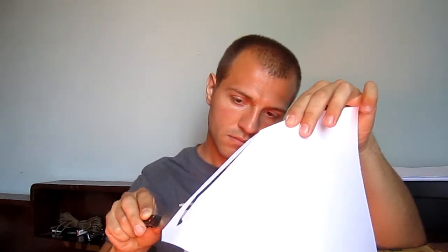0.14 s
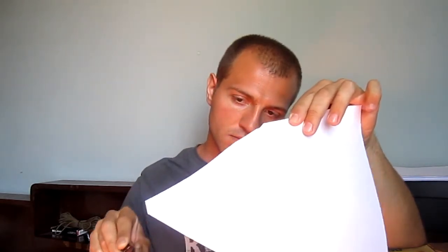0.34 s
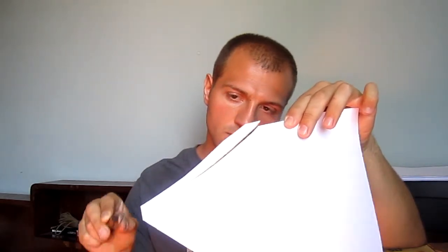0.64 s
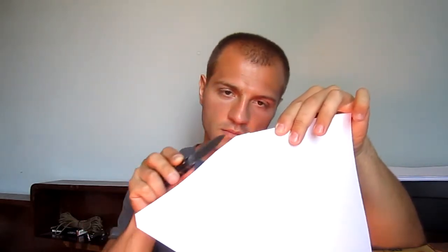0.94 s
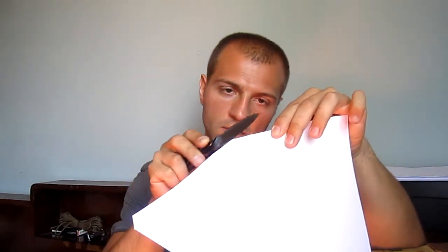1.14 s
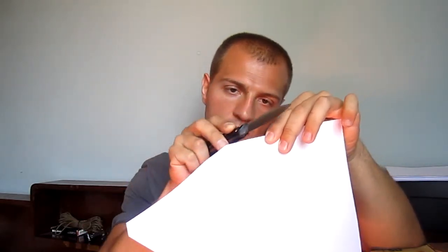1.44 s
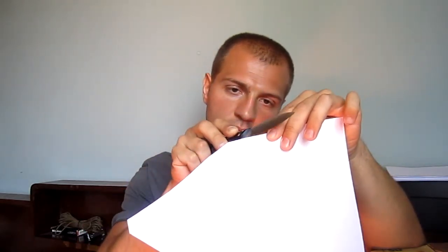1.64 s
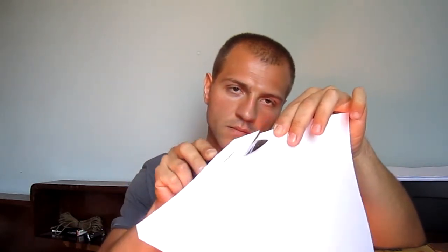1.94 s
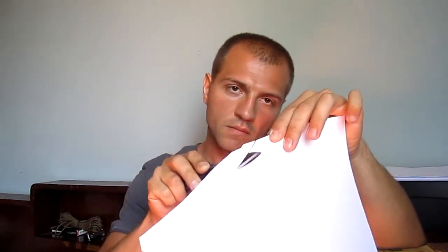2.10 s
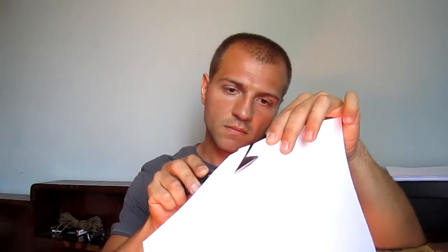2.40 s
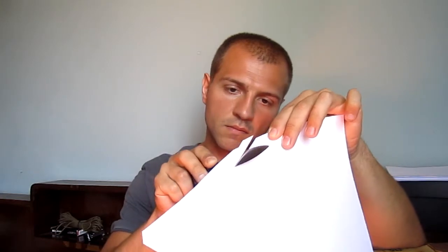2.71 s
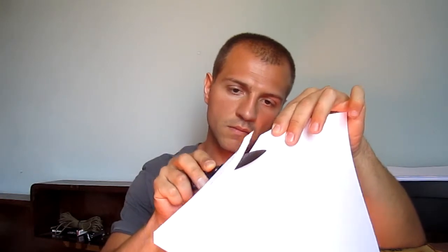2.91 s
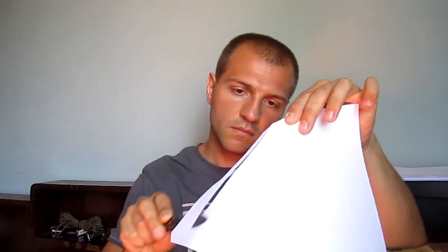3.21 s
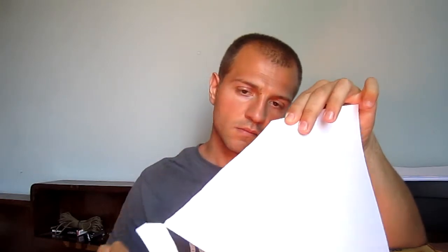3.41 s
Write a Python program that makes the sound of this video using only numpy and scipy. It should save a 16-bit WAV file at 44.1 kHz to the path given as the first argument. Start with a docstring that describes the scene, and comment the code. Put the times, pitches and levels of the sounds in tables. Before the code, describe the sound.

Close, dry paper cutting by knife indoors: one short raspy slice already under way, a quiet gap, a weaker slice that catches, light rubbing in the notch, then a strong bright rip ending in crisp ticks and faint room hum.

```python
"""Knife slicing a sheet of paper

A knife slices a hand-held sheet in three strokes, close by in a small room. Snapping fibres, a dense
stream of random impulses, and rubbing noise ring the sheet's resonances. The second stroke snags, the
blade scrapes in the notch, then rips through. Decaying noise bursts make the ticks, flicks and flaps,
over filtered room air, hum and a low rumble."""
import sys
import numpy as np
from scipy import signal
from scipy.fft import rfft, irfft, next_fast_len
from scipy.io import wavfile
from scipy.ndimage import uniform_filter1d

SR = 44100
rng = np.random.default_rng(int(sys.argv[2]) if len(sys.argv) > 2 else 0)


def unload_wav(signal):
    """Save mono or channel-first audio to the path in sys.argv[1] as 16-bit WAV at rate SR, clipped to [-1, 1]."""
    wavfile.write(
        sys.argv[1],
        SR,
        np.round(np.clip(np.atleast_2d(signal).T, -1, 1) * 32767).astype(np.int16),
    )


N = 156555

# fibres: snap rate and spread, wander of the blade's catch, rub relative to the snaps
SNAPS_PER_S, SNAP_SPREAD_DB, CATCH_PER_S, CATCH_DB, RUB_DB = 2600, 2.5, 260, 1.12, -3.5
# the bending sheet favours now one band, now another
FLEX_DB, FLEX_PER_S = 1.6, 35
# strokes: bite and release time constants, width of the zing, trims on the cuts and the scrape
ATTACK_S, RELEASE_S, ZING_WIDTH_HZ, CUT_DB, SCRAPE_DB = 0.0016, 0.0064, 600, -1, -1
RUMBLE_HZ, RUMBLE_WIDTH_HZ, AIR_DB = 77.4, 24.5, -43.5
# reflections relative to the direct sound, for the paper and for the sharp snaps
ROOM_DB, TICK_ROOM_DB = -5.5, -7
ROOM_LOW_T60_S, ROOM_HIGH_T60_S, ROOM_SPLIT_HZ, ROOM_DELAY_S = 0.26, 0.19, 2360, 0.004
TOP_HZ = 15680


def undb(db):
    """Decibels to gain."""
    return 10 ** (np.asarray(db) / 20)


def unit(x):
    """Scale to an rms of one."""
    return x / np.sqrt(np.mean(x ** 2))


def colour(x, points):
    """Minimum-phase filter through (Hz, dB) points, so nothing sounds ahead of its cause."""
    hz, db = np.array(points).T
    size = 4096
    f = np.maximum(np.fft.rfftfreq(size, 1 / SR), 1)
    log_gain = np.log(undb(np.interp(np.log(f), np.log(hz), db)))
    # folding the cepstrum forward makes the filter causal
    cepstrum = irfft(log_gain)
    cepstrum[1:size // 2] *= 2
    cepstrum[size // 2 + 1:] = 0
    impulse = irfft(np.exp(rfft(cepstrum)))
    return signal.fftconvolve(x, impulse)[:N]


def ring(x, hz, width):
    """One resonance, gain one at its centre."""
    return signal.lfilter(*signal.iirpeak(hz, hz / width, fs=SR), x)


def walk(rate):
    """Random wander with an rms of one, drawing a new value `rate` times a second."""
    hold = max(int(SR / rate), 1)
    steps = np.repeat(rng.standard_normal(N // hold + 1), hold)
    return unit(uniform_filter1d(steps, hold)[:N])


def force(t, curve):
    """Gain along a stroke of (s, dB) points, with a quick bite and release."""
    s, db = np.array(curve).T
    bite = np.maximum(s[0] - t, 0) / ATTACK_S
    release = np.maximum(t - s[-1], 0) / RELEASE_S
    return undb(np.interp(t, s, db)) * np.exp(-bite - release)


def fibres():
    """Fibres snap in uneven bunches while the flat of the blade rubs; both ring the sheet."""
    # Resonances of the held sheet. Each row: centre in Hz, width in Hz, gain in dB.
    sheet_modes = [(626, 20, 3), (776, 42, -0.5), (815, 28, -5.5), (1150, 36, -8.5), (1250, 27, -6.5),
                   (1303, 36, -3), (1612, 49, -6), (1817, 36, -1.5), (2055, 40, -1), (2985, 60, -4),
                   (3200, 34, -1), (3700, 30, -8), (4220, 30, -1), (6340, 33, -9)]
    strength = undb(SNAP_SPREAD_DB * rng.standard_normal(N))
    snaps = (rng.random(N) < SNAPS_PER_S / SR) * rng.choice([-1, 1], N) * strength
    rub = undb(RUB_DB) * rng.standard_normal(N)
    push = (unit(snaps) + rub) * undb(CATCH_DB * walk(CATCH_PER_S))
    return push + sum(undb(db) * ring(push, hz, width) for hz, width, db in sheet_modes)


def flex(x):
    """Each band swells and sinks on its own as the sheet bends."""
    edges_hz = [0, 1000, 1600, 2400, 3500, 5000, 7000, 10000, SR]
    size = next_fast_len(N)
    f, spectrum = np.fft.rfftfreq(size, 1 / SR), rfft(x, size)
    flexed = np.zeros(N)
    for lo, hi in zip(edges_hz, edges_hz[1:]):
        band = irfft(spectrum * (f >= lo) * (f < hi), size)[:N]
        flexed += band * undb(FLEX_DB * walk(FLEX_PER_S))
    return flexed


def zing(t, tear, path):
    """A narrow paper resonance with a moving centre, driven by the fibres."""
    s, hz, db = np.array(path).T
    carrier = np.exp(2j * np.pi * np.cumsum(np.interp(t, s, hz)) / SR)
    # shift the centre to zero, low-pass, then shift back
    low_pass = signal.butter(2, ZING_WIDTH_HZ / 2, fs=SR, output="sos")
    band = signal.sosfilt(low_pass, tear / carrier)
    return undb(np.interp(t, s, db)) * unit((band * carrier).real)


def cut(t, tear, curve, early, late, turn, path):
    """One stroke: the colour shifts as the blade travels down the sheet."""
    travel = np.interp(t, turn, [0, 1])
    rasp = (1 - travel) * unit(colour(tear, early)) + travel * unit(colour(tear, late))
    return undb(CUT_DB) * force(t, curve) * (rasp + zing(t, fibres(), path))


def first_cut(t, tear):
    """The blade bites at once and its pressure shapes the level of the first stroke."""
    # Force of the blade. Each row: time in seconds, level in dB ahead of the cut trim.
    pressure = [(0.0, -21.5), (0.05, -23.5), (0.078, -27), (0.134, -21), (0.152, -25), (0.224, -23),
                (0.27, -39)]
    # Colour of the sheet early and late in the stroke. Each row: frequency in Hz, relative level in dB.
    early = [(410, -42), (700, -15), (776, -10.5), (861, -13), (1290, -1.5), (1850, -4), (1950, -10),
             (2110, -5), (2370, -12), (3070, -10.5), (4640, -14.5), (6500, -8), (7400, -19), (8430, -14.5),
             (9600, -29), (13800, -31), (15500, -49)]
    late = [(410, -45), (700, -21), (797, -13), (993, -12), (1190, 2), (1450, -12), (1780, -2.5),
            (2340, -11.5), (2630, -5.5), (4030, -9.5), (5290, -5.5), (6420, -8), (7400, -18.5), (8540, -16),
            (15500, -39)]
    # Zing moving with the blade. Each row: time in seconds, centre in Hz, level against the rasp in dB.
    path = [(0, 2770, -9), (.06, 2650, -5), (.14, 2670, -8.5), (.24, 2880, -14)]
    turn_s = (0.15, 0.18)  # early to late colour
    return cut(t, tear, pressure, early, late, turn_s, path)


def snagged_cut(t, tear):
    """The second stroke presses through the fibres until it snags."""
    # Force of the blade. Each row: time in seconds, level in dB ahead of the cut trim.
    pressure = [(1.739, -29.5), (1.77, -33), (1.8, -30), (1.85, -28), (1.93, -23.5), (1.99, -25),
                (2.066, -22), (2.088, -28.5), (2.094, -44)]
    # Colour of the sheet early and late in the stroke. Each row: frequency in Hz, relative level in dB.
    early = [(410, -43), (700, -16), (787, -0.5), (980, -6), (1320, 1), (1450, -2), (1850, -0.5),
             (2030, -11.5), (2430, 0.5), (2630, -8), (4580, -2), (6180, -6), (7600, -13.5), (9110, -12.5),
             (13600, -30), (15500, -41)]
    late = [(410, -42), (700, -8.5), (776, -5.5), (1090, -7.5), (1320, -0.5), (1430, -7), (1870, -4.5),
            (2250, -11), (2430, -5), (3270, -8), (4030, -7), (5080, -3), (6850, -18), (8540, -13),
            (12800, -22.5), (15500, -34)]
    # Zing moving with the blade. Each row: time in seconds, centre in Hz, level against the rasp in dB.
    path = [(1.75, 3300, -9.5), (1.85, 3300, -19), (1.93, 3350, -8), (2.08, 3200, -22)]
    turn_s = (1.83, 2.06)  # early to late colour
    return cut(t, tear, pressure, early, late, turn_s, path)


def last_cut(t, tear):
    """The freed blade rips through, with the most force near the end."""
    # Force of the blade. Each row: time in seconds, level in dB ahead of the cut trim.
    pressure = [(2.945, -39.5), (2.962, -26), (3.0, -23.5), (3.05, -21), (3.085, -20), (3.122, -17.5),
                (3.155, -19.5), (3.24, -16.5), (3.3, -15), (3.349, -18), (3.378, -38.5)]
    # Colour of the sheet early and late in the stroke. Each row: frequency in Hz, relative level in dB.
    early = [(410, -43), (700, -14), (797, -5), (1070, -6), (1270, -4), (1410, -7), (1780, -5), (1920, -9),
             (2050, -8.5), (2730, -7), (3270, -3.5), (3540, -4), (5640, -3.5), (7400, -9.5), (9230, -10.5),
             (11200, -25), (15500, -28)]
    late = [(410, -42), (700, -8.5), (737, -3.5), (980, -6.5), (1160, 0), (1430, -6.5), (1830, -2.5),
            (1920, -9), (2190, -8), (3360, -6.5), (3920, -9), (4240, -7), (4700, -5.5), (6260, -8),
            (7600, -12.5), (12400, -24), (15500, -41)]
    # Zing moving with the blade. Each row: time in seconds, centre in Hz, level against the rasp in dB.
    path = [(2.96, 5700, -7), (3.02, 5700, -3), (3.09, 6100, -8.5), (3.18, 5300, -18), (3.26, 6000, -10),
            (3.3, 6500, -3.5), (3.33, 5860, -7), (3.37, 5900, -27)]
    turn_s = (3.18, 3.2)  # early to late colour
    return cut(t, tear, pressure, early, late, turn_s, path)


def body(t):
    """The whole sheet drums low under the blade while it is being cut."""
    # Drumming in each cut. Each row: time in seconds, level in dB.
    first = [(0, -41), (.14, -42.5), (.26, -46)]
    snagged = [(1.74, -42), (1.85, -43.5), (1.96, -35), (2.08, -38)]
    last = [(2.96, -40.5), (3.05, -36.5), (3.13, -35), (3.17, -37.5), (3.25, -37), (3.345, -30.5),
            (3.37, -43)]
    # Colour of the drumming. Each row: frequency in Hz, relative level in dB.
    drum_tone = [(70, -27.5), (100, -15), (130, 1), (190, -2.5), (250, -4), (320, 1.5), (400, -2), (490, 2),
                 (560, -1), (630, 1.5), (800, -7.5), (2000, -33.5)]
    level = force(t, first) + force(t, snagged) + force(t, last)
    return level * unit(colour(fibres(), drum_tone))


def sizzle(t):
    """The finest fibres spit at the top of the treble."""
    # Sizzle of the edge in two cuts. Each row: time in seconds, level in dB.
    snagged = [(1.87, -54), (1.9, -47), (2.0, -52), (2.085, -53)]
    last = [(3.33, -54), (3.35, -40), (3.375, -45), (3.4, -57), (3.43, -52)]
    # Colour of the sizzle. Each row: frequency in Hz, relative level in dB.
    sizzle_tone = [(3000, -30), (7500, -10), (9500, -4), (11000, -1), (13000, 2), (14000, -6), (15500, -10)]
    return (force(t, snagged) + force(t, last)) * unit(colour(fibres(), sizzle_tone))


def scrape(t):
    """The stuck blade saws lightly in its notch."""
    # Force of the rubbing blade. Each row: time in seconds, level in dB ahead of the scrape trim.
    rubbing = [(2.555, -45), (2.66, -45.5), (2.765, -48), (2.785, -67), (2.87, -56), (2.941, -44.5)]
    # Colour of the scrape. Each row: frequency in Hz, relative level in dB.
    scrape_tone = [(300, -2), (1500, 1), (2500, -9.5), (3300, -2.5), (4000, -6), (5200, -1), (6400, -7),
                   (7500, -14.5), (9200, -10), (10500, -20), (15500, -27)]
    return undb(SCRAPE_DB) * force(t, rubbing) * unit(colour(fibres(), scrape_tone))


def crinkles(t, events, tone):
    """Sudden bursts of coloured noise that die away exponentially."""
    envelope = np.zeros(N)
    for s, db, decay in events:
        envelope += undb(db) * (t >= s) * np.exp(-np.maximum(t - s, 0) / decay)
    noise = rng.standard_normal(N)
    return colour(envelope * noise, tone) / np.std(colour(noise, tone))


def ticks(t):
    """The edge catches on the paper in crisp, very short bursts."""
    # Catches of the edge. Each row: start in seconds, level in dB, decay time constant in seconds.
    catches = [(0.8331, -38.5, 0.0033), (1.738, -35, 0.0045), (2.129, -30.5, 0.0066), (2.135, -32.5, .005),
               (2.1836, -35, .002), (2.197, -32, 0.0048), (2.208, -36.5, 0.0021), (2.527, -40, .002),
               (2.561, -38, 0.0017), (2.9624, -21, 0.0015), (3.297, -8, 0.0011), (3.35, -17, 0.002),
               (3.413, -41, .003), (3.421, -30, .006), (3.432, -27, 0.0018)]
    # Colour of the ticks. Each row: frequency in Hz, relative level in dB.
    tick_tone = [(200, -21), (1300, 6.5), (2300, -3), (3300, -1.5), (5500, -3), (7200, -16), (9000, -12),
                 (13000, -28), (15500, -45)]
    return crinkles(t, catches, tick_tone)


def flicks(t):
    """The loose strip and the sheet's edge buckle suddenly."""
    # Flicks of the paper. Each row: start in seconds, level in dB, decay time constant in seconds.
    buckles = [(0.2817, -19, 0.0057), (0.288, -22.5, 0.0046), (.356, -42, .005), (.371, -37, .006),
               (.424, -43, .008), (1.738, -34, .002), (2.956, -33, .004), (2.962, -27, 0.003),
               (3.418, -32, 0.011), (3.463, -37, 0.0047)]
    # Colour of the flicks. Each row: frequency in Hz, relative level in dB.
    flick_tone = [(59, -48), (100, -20), (867, 4.5), (1090, 2.5), (2470, -4.5), (2630, -9), (3110, -7),
                  (3390, -9), (4840, -11.5), (9260, -25.5), (15000, -51)]
    return crinkles(t, buckles, flick_tone)


def flaps(t):
    """The sheet swings back and flaps softly, a duller and slower burst."""
    # Flaps of the sheet. Each row: start in seconds, level in dB, decay time constant in seconds.
    swings = [(0.281, -36, 0.041), (0.347, -35.5, 0.033), (0.416, -45, 0.032), (3.416, -37, .03)]
    # Colour of the flaps. Each row: frequency in Hz, relative level in dB.
    flap_tone = [(80, -16), (180, -7.5), (320, 5), (600, -5), (1400, -9.5), (3000, -22), (8000, -52)]
    return crinkles(t, swings, flap_tone)


def bumps(t):
    """The blade bumps dully against the taut sheet."""
    # Bumps of the blade. Each row: start in seconds, level in dB, decay time constant in seconds.
    knocks = [(1.79, -47, .06), (1.94, -38.5, .05), (3.2, -43, .06)]
    # Colour of the bumps. Each row: frequency in Hz, relative level in dB.
    bump_tone = [(60, -30), (115, -3), (195, -1), (270, -16), (600, -32), (2000, -60)]
    return crinkles(t, knocks, bump_tone)


def room(t, x, wet_db):
    """Reflections of a small room as decaying noise; the treble dies first."""
    age = t[:SR // 2]
    noise = rng.standard_normal(len(age))
    low = signal.sosfilt(signal.butter(2, ROOM_SPLIT_HZ, fs=SR, output="sos"), noise)
    high = signal.sosfilt(signal.butter(2, ROOM_SPLIT_HZ, "high", fs=SR, output="sos"), noise)
    low_tail = low * np.exp(-np.log(1000) * age / ROOM_LOW_T60_S)
    high_tail = high * np.exp(-np.log(1000) * age / ROOM_HIGH_T60_S)
    # subtracting avoids a notch where the two bands meet
    tail = (low_tail - high_tail) * (age > ROOM_DELAY_S)
    wet = undb(wet_db)
    reflections = signal.fftconvolve(x, tail / np.linalg.norm(tail))[:N]
    return (x + wet * reflections) / np.hypot(1, wet)


def drone(hz, width):
    """Noise through the same resonance twice: a wavering low tone."""
    return unit(ring(ring(rng.standard_normal(N), hz, width), hz, width))


def rumble(t):
    """A low resonance of noise that swells while the blade is stuck."""
    # Swell of the rumble. Each row: time in seconds, level in dB.
    swell = [(1.6, -53.5), (1.9, -52.5), (2.4, -49.5), (2.9, -50), (3.15, -54), (3.4, -62)]
    return undb(np.interp(t, *np.array(swell).T)) * drone(RUMBLE_HZ, RUMBLE_WIDTH_HZ)


def hum():
    """Narrow resonances of noise make the room's wavering hum."""
    # Tones of the hum. Each row: centre in Hz, width of each resonance pass in Hz, level in dB.
    tones = [(35.4, 5.2, -54.5), (75.6, 8.1, -58), (149.4, 10.5, -59)]
    return sum(undb(db) * drone(hz, width) for hz, width, db in tones)


def air():
    """Steady coloured noise for the quiet room."""
    # Colour of the room air. Each row: frequency in Hz, relative level in dB.
    air_tone = [(21, -25), (35, -4), (81, -4), (102, -12), (158, -8.5), (179, -15.5), (209, -8.5),
                (237, -14), (448, -12.5), (549, -15.5), (847, -15), (1090, -19), (1270, -18), (1380, -21),
                (7990, -40), (15500, -49.5)]
    return undb(AIR_DB) * unit(colour(rng.standard_normal(N), air_tone))


def scene():
    """Knife and paper in the room, the same in both ears."""
    t = np.arange(N) / SR
    tear = flex(fibres())
    strokes = first_cut(t, tear) + snagged_cut(t, tear) + last_cut(t, tear)
    paper = strokes + body(t) + sizzle(t) + scrape(t) + flaps(t) + bumps(t)
    snaps = ticks(t) + flicks(t)
    background = rumble(t) + hum() + air()
    mix = room(t, paper, ROOM_DB) + room(t, snaps, TICK_ROOM_DB) + background
    return np.tile(mix, (2, 1))


def record(dry):
    """A steep elliptic low-pass cuts the top of the treble."""
    return signal.sosfilt(signal.ellip(12, .1, 90, TOP_HZ, fs=SR, output="sos"), dry)


dry = scene()
out = record(dry)
unload_wav(out)
```